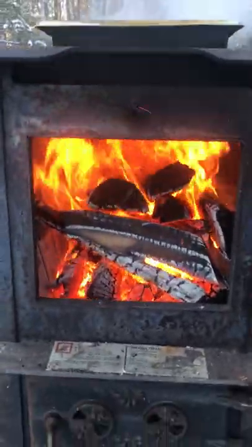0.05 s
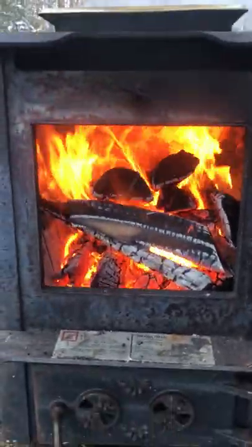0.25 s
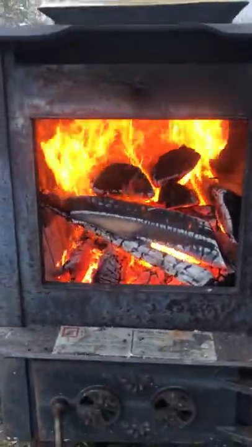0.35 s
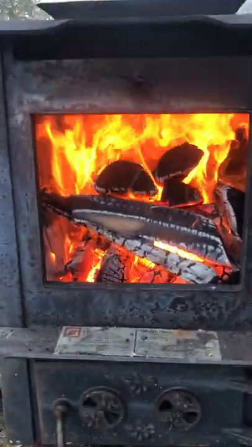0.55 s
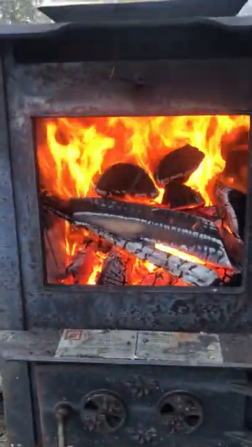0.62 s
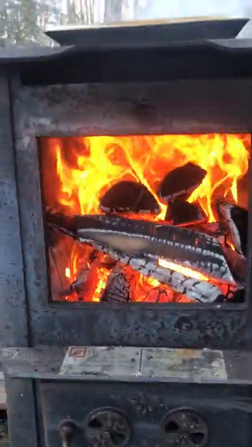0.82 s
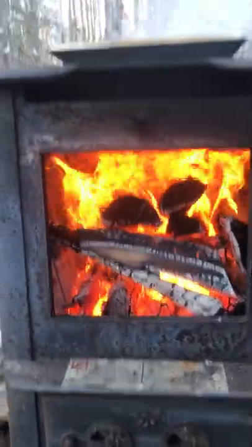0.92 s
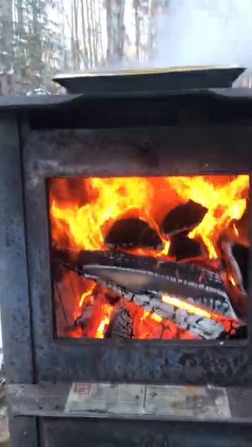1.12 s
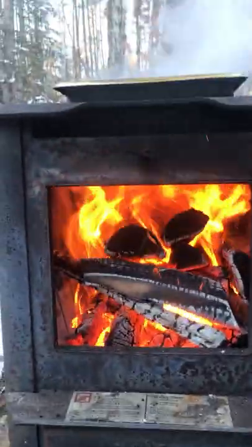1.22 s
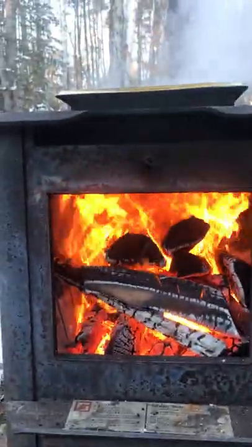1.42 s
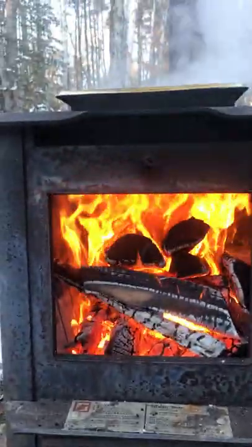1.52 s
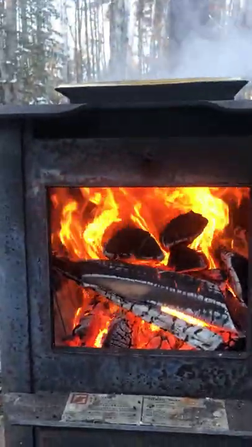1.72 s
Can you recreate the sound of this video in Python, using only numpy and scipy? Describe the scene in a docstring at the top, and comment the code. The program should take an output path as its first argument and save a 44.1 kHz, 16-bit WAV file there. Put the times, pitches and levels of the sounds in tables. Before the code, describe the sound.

A wood fire crackles close by in an open iron stove outdoors. Sharp, bright snaps come irregularly, the strongest at about 0.25, 0.65 and 1.0 seconds, with more around 1.1, 1.2 and 1.45. Smaller pops and tiny ember ticks fill the gaps. A soft low flame rumble and faint hiss run throughout, and a very faint whistle falls from about 1.45 to 1.65 seconds.

```python
"""Logs snap and crackle as they burn in an open iron stove outdoors, heard from close in front.
Pockets of steam split the wood: each snap is a sharp pulse, coloured by the splinter and the log,
that rattles briefly round the firebox. Tiny ticks of the embers fill the gaps. Underneath are
the low rumble of the flames and a soft hiss; near the end a faint whistle falls."""
import sys
import numpy as np
from scipy import signal
from scipy.fft import rfft, irfft, next_fast_len
from scipy.io import wavfile

SR = 44100
rng = np.random.default_rng(int(sys.argv[2]) if len(sys.argv) > 2 else 0)


def pcm_store(signal):
    """Save signal as 16-bit PCM."""
    levels = np.round(np.clip(np.atleast_2d(signal), -1, 1) * 32767)
    wavfile.write(sys.argv[1], SR, levels.astype(np.int16).T)


N = 77175   # 1.75 seconds


def from_db(db):
    """Turn decibels into a number to multiply by."""
    return 10 ** (np.asarray(db) / 20)


def rms_one(x):
    """Scale a sound so that its average strength (rms) is 1."""
    return x / np.sqrt(np.mean(x ** 2) + 1e-20)


def colour(x, points):
    """Make some pitches louder and others softer, following rows of (pitch_hz, level_db)."""
    size = 2 * next_fast_len(len(x))
    hz, db = np.transpose(points)
    grid_hz = np.maximum(np.arange(size // 2 + 1) * SR / size, 1)
    gain = from_db(np.interp(np.log(grid_hz), np.log(hz), db))
    # shape the filter so that nothing sounds before its cause (minimum phase)
    cepstrum = irfft(np.log(gain))
    cepstrum[1:size // 2] *= 2
    cepstrum[size // 2 + 1:] = 0
    return irfft(rfft(x, size) * np.exp(rfft(cepstrum)))[:len(x)]


def resonate(x, hz, q):
    """Keep the sound near one pitch; a higher sharpness q rings longer."""
    size = 2 * next_fast_len(len(x))
    ratio = np.maximum(np.arange(size // 2 + 1) * SR / size, 1) / hz
    return irfft(rfft(x, size) / (1 + 1j * q * (ratio - 1 / ratio)) ** 2)[:len(x)]


def drift(rate_hz):
    """A smooth random wobble of about 1 either way."""
    r = np.exp(-2 * np.pi * rate_hz / SR)
    return rms_one(signal.lfilter([1], [1, -2 * r, r * r], rng.standard_normal(N + SR))[SR:])


def dying_noise(t, fade_s, delay_s):
    """A burst of noise with energy 1 that starts after delay_s and falls by about 15 dB over each fade_s."""
    envelope = from_db(-60 * t / fade_s) * (t >= delay_s)
    x = rng.standard_normal(len(t)) * envelope
    for _ in range(2):   # even out the pitches, then reapply a gentler fade
        spectrum = rfft(x)
        x = irfft(spectrum / (np.abs(spectrum) + 1e-20), len(t)) * envelope ** 0.25
    return x / np.sqrt(np.sum(x ** 2) + 1e-20)


def in_time(rows):
    """Join timed rows by straight lines: one curve for each column after the time."""
    time_s, *columns = np.transpose(rows)
    return [np.interp(np.arange(N) / SR, time_s, column) for column in columns]


def add(out, start_s, sound):
    """Mix a sound in at its start time."""
    start = int(np.clip(start_s * SR, 0, N - 1))
    out[start:start + len(sound)] += sound[:N - start]


def hiss():
    """Gas and steam seep from the wood with a soft, flickering hiss."""
    # tone of the hiss: pitch_hz, relative_db
    hiss_colour = [(200, -23.5), (450, 6.5), (800, -1), (1300, 4.5), (2200, -0.5), (3500, 0), (5000, -2),
                   (7000, -2), (9500, -6), (12500, -5.5), (15500, -9.5), (16500, -36)]
    seep = rms_one(colour(rng.standard_normal(N + SR), hiss_colour)[SR:])
    level_db, flicker_db = -60, 2
    return seep * from_db(level_db + flicker_db * drift(rate_hz=57))


def flames():
    """Swirling flames rumble and make the air in the firebox boom at its own pitches."""
    # tone of the rumble: pitch_hz, relative_db
    rumble_colour = [(15, -43), (25, -30), (36, -11.5), (48, 4), (62, -1), (80, 3.5), (100, 3.5),
                     (128, -4.5), (150, -5), (200, -12), (260, -13), (500, -18), (1000, -23), (3000, -61)]
    # ringing of the firebox air, before the swell: pitch_hz, half_width_hz, level_db
    air_rings = [(121, 6.55, -54), (184.6, 5.2, -86), (282.5, 16, -70), (319.7, 22, -71),
                 (367.7, 9.6, -71.5), (425.4, 19, -70), (561, 17.5, -74)]
    # swell of the flames: time_s, gain_db
    swell = [(0, 0.5), (.17, 1), (.26, 0.5), (.32, -2), (.39, 1.5), (.47, 1), (.56, 0), (.66, 1.5),
             (.73, -1.5), (.8, 2), (.88, 1), (.93, -5), (1.0, 4), (1.16, -3), (1.31, 1), (1.42, -1.5),
             (1.6, -2.5), (1.75, -3)]
    rumble_db, flutter_db = -53, 1
    rumble = from_db(rumble_db) * rms_one(colour(rng.standard_normal(N + SR), rumble_colour)[SR:])
    boom = np.zeros(N)
    for hz, half_width_hz, db in air_rings:
        ring = resonate(rng.standard_normal(N + SR), hz, q=hz / (2 * half_width_hz))[SR:]
        boom += from_db(db) * rms_one(ring)
    swell_db, = in_time(swell)
    return (rumble + boom) * from_db(swell_db + flutter_db * drift(rate_hz=12))


def whistle():
    """A thin tone and its octave sink in pitch, perhaps steam leaving a log."""
    # path of the lower tone: time_s, pitch_hz, level_db
    glide = [(1.44, 745, -85), (1.485, 721, -65), (1.53, 700, -83), (1.58, 652, -63), (1.62, 613, -68.5),
             (1.67, 628, -80)]
    hz, db = in_time(glide)
    wavering_hz = hz * (1 + 0.0066 * drift(rate_hz=35))
    phase = 2 * np.pi * np.cumsum(wavering_hz) / SR
    tone = np.sin(phase) + from_db(-6) * np.sin(2 * phase)
    t = np.arange(N) / SR
    sounding = (t > glide[0][0]) & (t < glide[-1][0])
    return sounding * np.sqrt(2) * from_db(db) * tone


def snap(push_db, splinter_hz, splinter_q, log_db, knock_db, ring_hz, ring_db, echo_db, size=4096):
    """One break: a pulse, tearing fibres and firebox echoes set the splinter and the log ringing."""
    t = np.arange(size) / SR
    pulse = from_db(-5) * dying_noise(t, fade_s=0.0022, delay_s=4 / SR)   # fibres go on tearing
    pulse[0] = 1   # the break itself
    echo_delay_s = 0.00045
    rattle = dying_noise(t, fade_s=0.028, delay_s=echo_delay_s)
    linger = from_db(-18.5) * dying_noise(t, fade_s=0.12, delay_s=echo_delay_s)
    push = pulse + from_db(echo_db) * (rattle + linger)
    push = from_db(push_db) * push / np.sqrt(np.sum(push ** 2))
    splinter = resonate(push, splinter_hz, splinter_q)
    log_body = from_db(log_db) * resonate(push, hz=2690, q=1.11)
    dull_knock = from_db(knock_db) * resonate(push, hz=1214, q=0.69)
    wood = splinter - log_body + dull_knock
    ring = from_db(ring_db) * resonate(wood, ring_hz, q=5.3)   # the piece that breaks off
    return wood + ring


def ember_ticks(ticks_per_s=85, count=500):
    """Embers deep in the firebox give tiny random snaps, most barely above the hiss."""
    softest_db, spread_db, range_db = -37.5, 3.5, 10
    low_hz, high_hz = 5370, 13000
    starts_s = np.cumsum(rng.exponential(1, count)) / ticks_per_s
    pushes_db = softest_db + np.minimum(rng.exponential(spread_db, count), range_db)
    pitches_hz = low_hz * (high_hz / low_hz) ** rng.random(count)
    out = np.zeros(N)
    for start_s, db, hz in zip(starts_s, pushes_db, pitches_hz):
        if start_s < N / SR:
            tick = snap(db, hz, splinter_q=1.3, log_db=-11, knock_db=-8,
                        ring_hz=hz, ring_db=-4, echo_db=6, size=1024)
            add(out, start_s, tick)
    return out


def wood_snaps():
    """Pockets of steam split the logs with clear snaps and pops."""
    # one break a row: start_s, push_db, splinter_hz, splinter_q (sharpness, no unit),
    # log_db, knock_db, ring_hz, ring_db, echo_db
    breaks = [(0.0717, -21, 6840, 0.59, -8, -30, 12160.0, 6, -3),
              (0.181, -25, 7500.0, 0.82, 1.5, -2, 8880.0, -3, 3),
              (0.2008, -17, 8100.0, 1.15, -2.5, -3, 7300, -6, 1),
              (0.2164, -15.5, 6700.0, 1.2, -8, -6, 13000, 5, -4),
              (0.2445, 4.5, 9800, 0.58, -20, -15, 9330, -5, -9),
              (0.2533, -20.5, 14500.0, 0.38, 8, 1, 6020.0, 2, -4),
              (0.2614, -16, 11800.0, 0.85, 9.5, 5, 4660.0, 7, -7),
              (0.3322, -7, 8760, 2.5, -13, -32, 6230, 2, -7),
              (0.3834, -22.5, 8400.0, 1.3, -5, -28, 11980.0, -1, 2),
              (0.4028, -8, 8850, 1.55, -11, -15, 8010.0, -3, -5),
              (0.4682, -10.5, 11100, 0.88, -4, -21, 8970.0, -1, -15),
              (0.4712, -15, 6000, 1.2, -6, -13, 12920.0, 2, 1),
              (0.488, -17.5, 8500.0, 0.68, -13, -1, 11270.0, 3, -1),
              (0.5345, -17, 5600.0, 0.34, 2.5, 0, 11880.0, -4, 0),
              (0.5488, -10.5, 12000, 2.47, -28, -34, 8570, 11.5, -16),
              (0.607, -26, 13300.0, 0.36, -26, -11, 8860.0, 9.5, -13),
              (0.618, -19, 6840, 1.2, -5, -2.5, 12000.0, 6, 1),
              (0.6561, -20.5, 6500.0, 0.36, -28, 7.5, 12500, -2, 1),
              (0.659, 1.5, 8670, 3.4, -12, -43, 4700, 1, -7),
              (0.7201, -20, 9900, 1.7, 1.5, 1.5, 5600, 1, -2),
              (0.8396, -15, 7800, 1.2, -15, -7, 11640.0, 6, -10),
              (0.8526, -16, 7150, 1.1, -3, -28, 11980.0, -4, -8),
              (0.8804, -22.5, 10100.0, 1.4, -10, -26, 6100.0, 2, -6),
              (0.9288, -17, 9550, 1.7, -3, -1, 2730.0, 2, -1),
              (0.952, -28, 6600.0, 0.4, 1, -3, 3800.0, 8, 5),
              (0.9763, 2.5, 5560, 1.17, -7, -5, 2630, 8.5, 4),
              (0.995, -19, 5500.0, 0.66, 0, 1, 7310.0, 7, 7),
              (1.0331, -25, 9400.0, 0.36, -23, 0, 11790.0, -7, 0),
              (1.0569, -16.5, 9400.0, 0.7, -2.5, -7, 6760, -4, -6),
              (1.0711, -15.5, 3800.0, 0.29, -28, -3, 12000.0, -7, -4),
              (1.0915, -20, 10400.0, 0.58, 0, -28, 6470.0, -2, -7),
              (1.0958, -4, 9050, 1.7, 2.5, -7, 6140.0, 6.5, -4.5),
              (1.1608, -15, 3580, 0.5, -24, 5, 12150.0, 6, 8),
              (1.1985, -0.5, 8900, 0.71, -8, -11.5, 11900, 4, -10.5),
              (1.2159, -24, 4500.0, 0.4, -19, 1, 12130.0, 4, 10),
              (1.277, -23, 6100.0, 0.5, -28, -9, 6140, -1, -11),
              (1.2812, -16, 8400, 1.14, -7, -12, 12800, 3, -5.5),
              (1.3301, -27.5, 9800.0, 1, -37, -25, 11240.0, 3, -7),
              (1.407, -21.5, 9500.0, 1.4, 1, -23, 5390.0, -1, 4),
              (1.4166, -2, 6400, 1.25, -0.5, -6, 7280.0, -7, -8.5),
              (1.4375, -12, 7400, 0.76, -0.5, -5, 6400, -2, -12),
              (1.4692, -3.5, 10300, 1.04, -11, -23, 4070.0, 3, -7),
              (1.552, -19, 14700, 2.2, -28, -28, 8630.0, -1.5, -12),
              (1.5755, -14.5, 4000, 0.54, -3, -3, 2650, 6.5, -6),
              (1.6014, -16, 6150, 1.3, -29, -24, 5770, 7, -5),
              (1.6254, -24, 5900.0, 0.51, -30, -6, 12310.0, 1, -7),
              (1.6964, -25, 7500.0, 2.54, -7, 0, 10170.0, 1, -10)]
    out = np.zeros(N)
    for start_s, *settings in breaks:
        add(out, start_s, snap(*settings))
    return out


def crackle():
    """Snaps and ticks as they leave the stove's opening."""
    # tone shared by all the crackle: pitch_hz, gain_db
    crackle_colour = [(300, -3), (700, -1), (1500, -3.5), (2700, 1), (5000, 0.5), (9200, 1), (12500, 0.5),
                      (16500, -0.5)]
    return colour(wood_snaps() + ember_ticks(), crackle_colour)


def scene():
    """Flames, hiss and whistle under the crackle, in one channel."""
    return (flames() + hiss() + whistle() + crackle())[None]


def record(dry):
    """Cut away the very highest treble steeply."""
    cutoff_hz = 16200
    return signal.sosfilt(signal.ellip(10, .2, 70, cutoff_hz, fs=SR, output="sos"), dry)


dry = scene()
out = record(dry)
pcm_store(out)
```